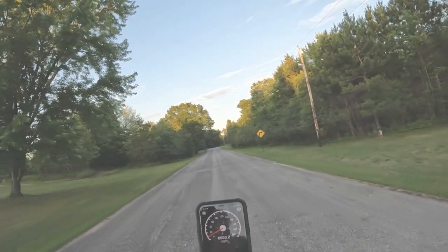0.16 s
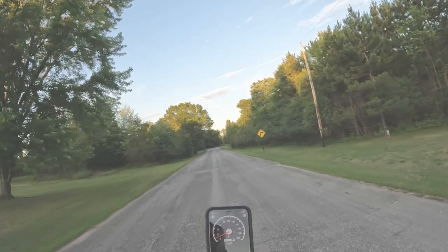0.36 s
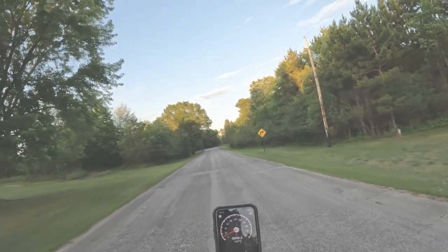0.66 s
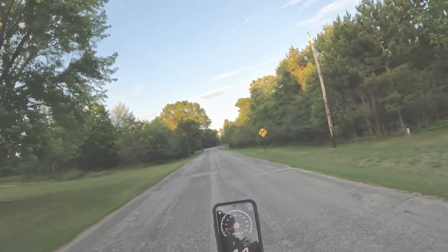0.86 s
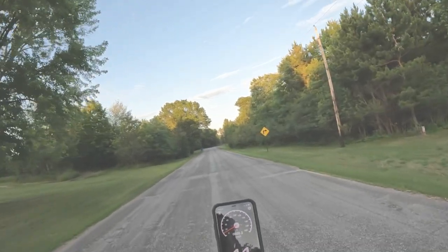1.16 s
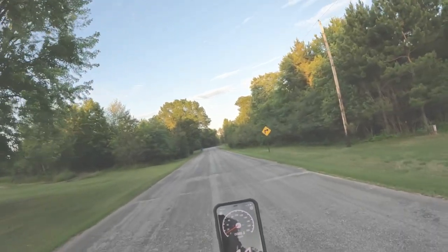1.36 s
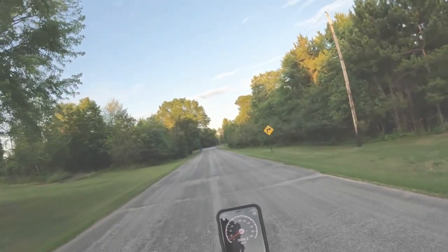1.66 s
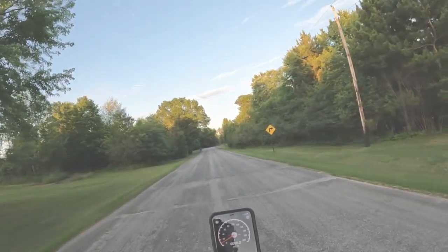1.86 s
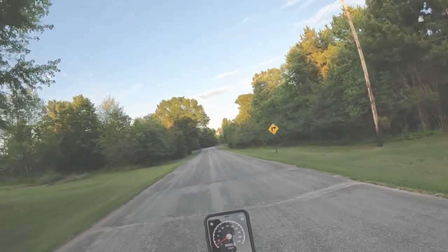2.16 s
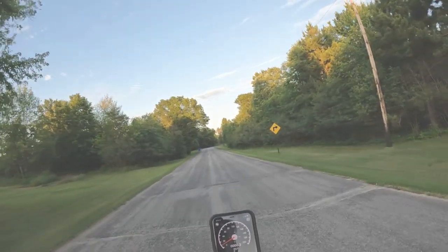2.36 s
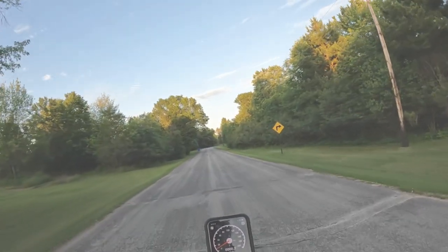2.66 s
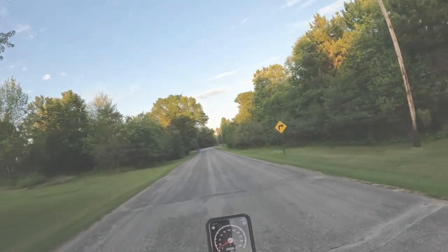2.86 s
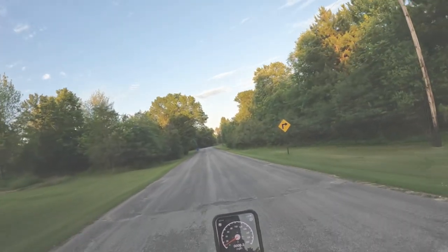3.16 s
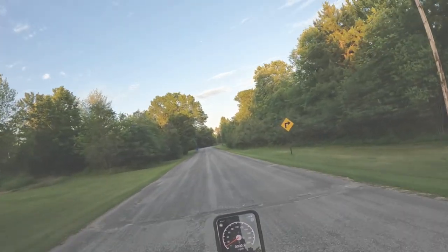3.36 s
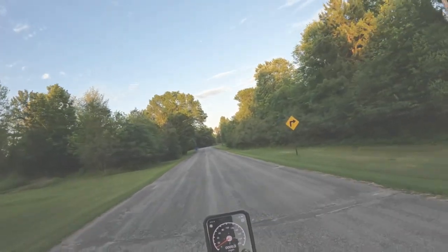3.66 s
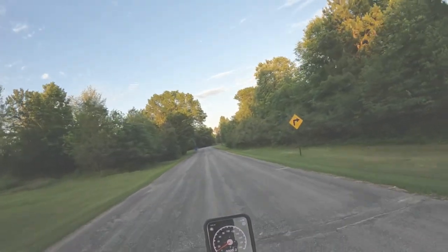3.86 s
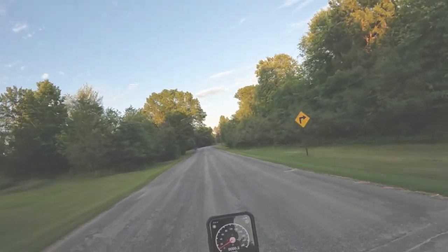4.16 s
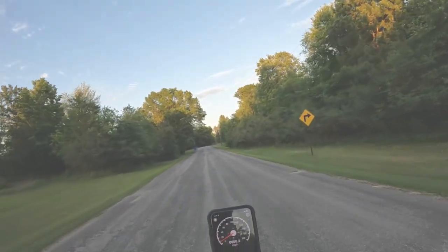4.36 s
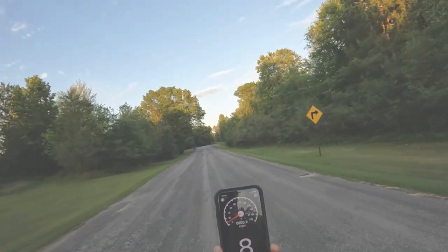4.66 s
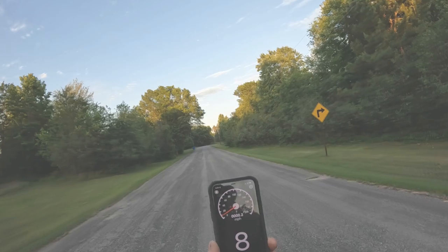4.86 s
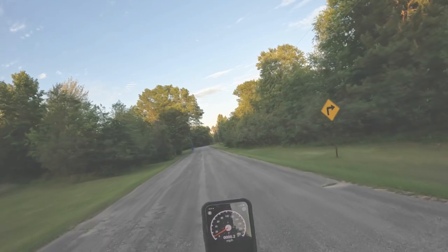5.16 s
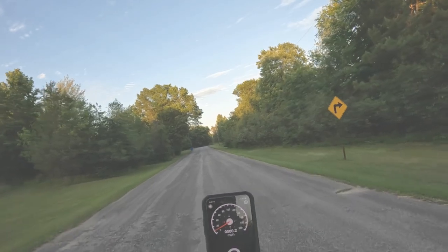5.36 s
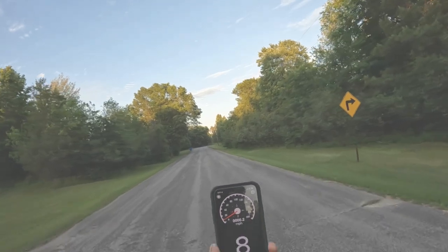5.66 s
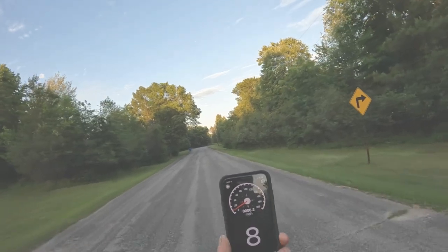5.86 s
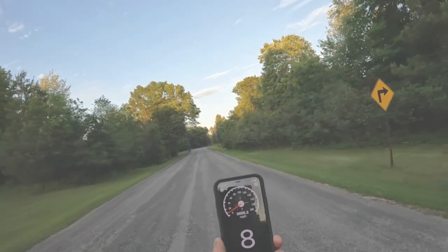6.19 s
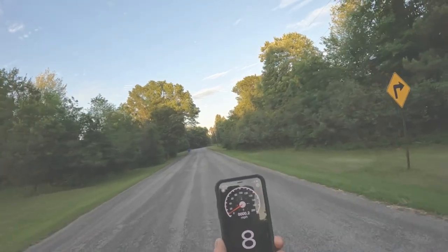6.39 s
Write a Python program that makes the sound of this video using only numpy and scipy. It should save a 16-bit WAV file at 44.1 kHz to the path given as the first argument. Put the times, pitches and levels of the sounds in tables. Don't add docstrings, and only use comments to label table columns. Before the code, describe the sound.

A small electric scooter motor sings a steady mid-pitched whine over chain rattle, tyre rumble, crack knocks and buffeting headwind on a paved road.

```python
import sys
import numpy as np
from scipy import signal
from scipy.fft import rfft, irfft, next_fast_len
from scipy.io import wavfile
from scipy.ndimage import uniform_filter1d

SR = 44100
rng = np.random.default_rng(int(sys.argv[2]) if len(sys.argv) > 2 else 0)


def master_out(mix):
    frames = np.transpose(np.atleast_2d(mix))
    ceiling = np.clip(frames, -1, 1)
    pcm = np.round(ceiling * 32767).astype(np.int16)
    wavfile.write(sys.argv[1], SR, pcm)


def volts(x):
    e = np.asarray(x, float) / 20
    return 10 ** e


N = 287973

# (start [s], end [s], level [dB], fade in [dB/s], fade out [dB/s])
INSECTS = [
    (1.35, 3.34, -67, 39, 100),
    (3.4, 3.94, -75.5, 60, 61),
    (4.8, 4.84, -69.5, 24, 250),
    (0.2, 5.9, -80, 30, 14.5),
]

# (time [s], buffet level [dB])
GUSTS = [(0, -34), (.6, -23), (.95, -22), (1.02, -33.5), (2, -38.5), (2.45, -44.5), (2.95, -30.5),
         (3.2, -33.5), (3.55, -28), (4.5, -29.5), (5.15, -25.5), (5.4, -22), (5.9, -21), (6.53, -18.5)]
# (frequency [Hz], density [dB per Hz])
WIND_SPECTRUM = [(10, -8), (25, 2), (60, -1), (110, -11), (170, -25.5), (300, -45.5), (1500, -100)]
# (time [s], buffet change [dB], puff change [dB])
EDDIES = [(.11, 7, -1.5), (.28, 1, 6), (.44, -0.5, 0.5), (.55, 1, 9), (.68, 5, 7), (.74, -5.5, -3.5),
          (.83, -7, -4), (.91, 4.5, 13), (1.33, 4.5, 7.5), (2.18, 14, 16), (2.92, 1.5, 8), (3.07, -6, -2.5),
          (3.48, 1, 8.5), (3.77, 6.5, 10.5), (4.07, 4, 6), (4.22, -1, 8.5), (4.5, 5.5, 4), (4.68, 4.5, 9.5),
          (4.82, 11.5, 18.5), (4.94, -13, -6), (5.15, -9.5, -6), (5.25, 0.5, 10), (5.5, -0.2, 9),
          (5.63, -0.2, 8.5), (5.78, -14.5, -7), (5.89, 3, 9.5), (6.02, 1, 6), (6.14, 2, 7), (6.27, 1.5, 8),
          (6.37, 1.5, 7)]
EDDY_S, PUFF_DB, PUFF_PER_GUST = 0.078, -38.5, .6
SLAP_DB, SLAP_PER_PUFF = -28, 1.6

# (frequency [Hz], density [dB per Hz])
ROAD_SPECTRUM = [(150, -28.5), (240, -6.5), (330, -2.5), (420, -2.5), (500, -3.5), (600, 1), (700, -7.5),
                 (760, -12.5), (830, -7.5), (950, -24), (1300, -27.5)]
# (time [s], level change [dB], length [s])
PATCHES = [(.28, 3, 0.11), (1.42, 3, .2), (1.56, 3.5, 0.054), (2.21, 2.5, .06), (2.73, -2.5, 0.56),
           (3.46, 3, .1), (4.68, -2.5, 0.069), (4.86, -2, 0.18), (5.03, 3.3, 0.12), (5.16, -2.5, 0.084),
           (6.1, 3, 0.11), (6.45, -4, 0.071)]
ROAD_DB, ROAD_PER_LOAD = -29.5, 0.13
# (time [s], thud peak [dB], upper ring peak [dB])
CRACKS = [(0.245, -20, -37), (1.42, -20, -46), (1.541, -16.5, -31), (1.775, -24, -38), (2.201, -19.5, -45),
          (2.312, -30, -43), (2.503, -25, -37), (2.832, -29, -37.5), (3.178, -31, -40),
          (3.848, -18.5, -30.5), (5.003, -20, -39), (5.072, -20.5, -38), (5.771, -24, -43),
          (6.104, -18, -25.5), (6.267, -23, -34)]

# (time [s], level [dB])
LOAD = [(0, -38.5), (.5, -39), (1.2, -41), (2.3, -42.9), (3.6, -41.5), (4, -39.5), (4.7, -41), (5.3, -39),
        (5.9, -40.5), (6.53, -39.5)]
# (frequency [Hz], density [dB per Hz])
CHAIN_SPECTRUM = [(700, -30), (900, -7.5), (1130, -8.5), (1750, -11), (2150, -15), (3160, -15.5),
                  (4150, -21.5), (4800, -29.5), (6000, -27.5), (8000, -33), (8500, -40), (9700, -45.5),
                  (11500, -48.5), (13500, -58.5), (14500, -75)]
# (frequency [Hz], width [Hz], level [dB])
FRAME = [(1264, 180, 0.5), (1395, 180, 0), (1557, 200, 2), (1875, 150, -2.5), (2043, 160, -5),
         (2287, 150, 2), (2398, 170, 1), (2570, 90, -2.5), (2694, 40, 1), (2830, 200, 0.5), (3490, 300, -4),
         (3606, 200, -2), (4345, 240, -13), (4540, 240, -7), (4930, 220, -12.5), (5235, 200, -11.5),
         (5500, 260, -17), (6710, 340, -18), (10500, 1200, -32)]
CHAIN_DB = -1.1

# (time [s], motor tone [Hz])
DRIVE = [(0, 394.2), (.2, 404.5), (.34, 397), (.6, 391.6), (1.13, 401.4), (1.4, 393.8), (1.75, 397.1),
         (2.05, 406.5), (2.25, 403.5), (2.4, 394.5), (2.6, 402.7), (2.9, 405.2), (3.3, 400.2),
         (4.55, 404.7), (5.33, 394.1), (5.58, 416.5), (5.9, 398.8), (6.53, 410)]
# (time [s], tone change [Hz])
HOPS = [
    (3.69, 3),
    (3.82, 11),
    (3.92, -3),
    (4.02, 3),
    (4.15, -4),
    (4.85, -5),
    (5.01, 19),
    (5.5, 4),
    (5.66, 3),
    (6.4, -3.5),
]
# (time [s], tone level [dB])
PULL = [(0, -27.7), (.1, -22), (1, -17.5), (1.35, -23), (1.75, -23), (1.85, -18.5), (2.3, -23.5),
        (3.4, -19), (3.9, -20.7), (4.9, -20), (5.1, -22.5), (5.5, -23.5), (6, -19.5), (6.53, -21.6)]
# (time [s], tone level change [dB])
SLACK = [(.17, 5), (.59, -7.5), (.74, -3), (.92, -3.5), (1.08, -4.5), (1.43, -8), (1.5, -5), (1.58, -4.5),
         (1.7, -6), (1.96, -3), (2.32, 2.8), (2.53, 5), (3.47, -2.8), (3.89, -4), (4.94, 4), (5.02, -3.5),
         (5.34, -3.2), (5.43, 5), (6.13, -5), (6.25, -2.5)]
HOP_S, SLACK_S = 0.0797, 0.071
# (multiple of the tone, level re tone [dB], flutter [dB], wheel throb [dB], sprocket throb [dB])
ORDERS = [(4 / 3, -18.5, 2.5, 0, 0), (1.5, -23, 3, -1, 0.5), (2, -19.5, 2.5, 5, 3), (3, -34.5, 3, 1.5, 0.5),
          (4, -25.5, 2.5, 1, 0.5)]
# (multiple of the tone, level re tone [dB], wander [Hz])
SIDE_TONES = [(.842, -19.5, 6), (1.158, -21.5, 6), (3.165, -37, 8), (3.845, -29, 9), (4.155, -39.5, 9),
              (6.67, -36, 12)]
WHEEL_RATIO, SPROCKET_RATIO, LOOP_RATIO = 1 / 47, .0923, 1 / 145
WHEEL_START, SPROCKET_START, LOOP_START = -1.3, 1.66, -1.63
LOOP_DB = 0.63
LOWEST_PER_LOAD, SECOND_PER_LOAD, FOURTH_PER_LOAD, SECOND_DB_PER_HZ = 1.5, .5, 1.4, 0.26

# (low edge [Hz], high edge [Hz], share of time)
DROPOUTS = [(7600, 8250, .03), (8250, 8950, .13), (8950, 9650, .2), (9650, 10350, .2), (10350, 11200, .14),
            (11200, 11900, .03)]


def rms_one(x):
    return x / np.sqrt(np.mean(x ** 2) + 1e-20)


def in_time(rows):
    s, *columns = np.transpose(rows)
    return [np.interp(np.arange(N) / SR, s, column) for column in columns]


def bumps(rows):
    t = np.arange(0, N + 99, 100) / SR
    coarse = sum(height * np.exp(-(2 * (t - s) / length) ** 2) for s, height, length in rows)
    return np.interp(np.arange(N) / SR, t, coarse)


def drift(rate):
    r = np.exp(-40 * np.pi * rate / SR)
    noise = rng.standard_normal(N // 20 + 4002)
    slow = signal.lfilter([1], [1, -2 * r, r * r], noise)[4000:]
    return np.interp(np.arange(N) / 20, np.arange(len(slow)), rms_one(slow))


def colour(x, spectrum):
    hz, level_db = np.transpose(spectrum)
    size = next_fast_len(N)
    grid = np.arange(size // 2 + 1) * SR / size + 1
    gain_db = np.interp(np.log(grid), np.log(hz), level_db, left=-70, right=-110)
    return rms_one(irfft(rfft(x, size) * volts(gain_db), size)[:N])


def resonate(x, hz, width):
    r = np.exp(-np.pi * width / SR)
    poles = [1, -2 * r * np.cos(2 * np.pi * hz / SR), r * r]
    return signal.lfilter([(1 - r * r) / 2, 0, (r * r - 1) / 2], poles, x)


def band_noise(order, low_hz, high_hz):
    band = signal.butter(order, [low_hz, high_hz], "band", fs=SR, output="sos")
    return signal.sosfilt(band, rng.standard_normal(N))


def insects():
    t = np.arange(N) / SR
    trees_db = [db - rise * np.maximum(start - t, 0) - fall * np.maximum(t - end, 0)
                for start, end, db, rise, fall in INSECTS]
    buzz_db = np.max(trees_db, axis=0)
    band = resonate(resonate(rng.standard_normal(N), 12500, 1500), 13100, 1500)
    return volts(buzz_db + 1.2 * drift(8) + 1.5 * drift(90)) * rms_one(band)


def wind():
    gust_db, = in_time(GUSTS)
    lull_db = bumps([(6.47, -9.5, .08)])
    buffet_db = gust_db + lull_db + bumps([(s, db, EDDY_S) for s, db, _ in EDDIES])
    puff_db = PUFF_DB + PUFF_PER_GUST * (gust_db - gust_db.mean()) + lull_db
    puff_db = puff_db + bumps([(s, db, EDDY_S) for s, _, db in EDDIES])
    lumps = drift(16)
    deep = rms_one(volts(2.0 * lumps) * colour(rng.standard_normal(N), WIND_SPECTRUM))
    puffs = rms_one(volts(2.3 * lumps) * band_noise(3, 75, 170))
    slaps = rms_one(band_noise(2, 170, 330))
    slap_db = SLAP_DB + SLAP_PER_PUFF * (puff_db - puff_db.max())
    total = volts(slap_db) * slaps + volts(buffet_db) * deep + volts(puff_db - 2.5) * puffs
    return signal.sosfilt(signal.butter(4, 900, fs=SR, output="sos"), total)


def tyres(road_db):
    lumpy_db = road_db + 2.0 + 1.6 * drift(9) + .8 * drift(30)
    return volts(lumpy_db) * colour(rng.standard_normal(N), ROAD_SPECTRUM)


def knocks():
    low, high = np.zeros((2, N)) + 1e-18
    for s, low_db, high_db in CRACKS:
        low[round(s * SR)] += volts(low_db)
        high[round(s * SR)] += volts(high_db)
    thud = resonate(resonate(resonate(low, 600, 330), 660, 400), 704, 330)
    ring = resonate(resonate(resonate(high, 1310, 240), 1330, 300), 1370, 240)
    soft = signal.butter(4, 2500, fs=SR, output="sos")
    return signal.sosfilt(soft, volts(40.5) * thud + volts(45.5) * ring)


def chain(tone_hz, chain_db):
    phase = 2 * np.pi * np.cumsum(tone_hz) / SR
    bunching_db = 1.2 * np.cos(phase) + .6 * np.cos(SPROCKET_RATIO * phase) + 0.36 * np.cos(WHEEL_RATIO * phase)
    sizes = volts(1.8 * np.minimum(rng.exponential(1, N), 4) + bunching_db)
    contacts = rms_one(sizes * rng.standard_normal(N))
    ringing = np.zeros(N)
    for hz, width, db in FRAME:
        struck = np.roll(contacts, rng.integers(N))
        part = resonate(resonate(struck, hz, width), hz, width)
        ringing += volts(db + 2.1 * drift(12)) * part
    broad = colour(contacts[::-1], CHAIN_SPECTRUM)
    level = volts(chain_db + .4 * drift(9.7) + .9 * drift(40))
    return level * (volts(1.5) * broad + volts(.5) * rms_one(ringing))


def motor(tone_hz, tone_db, load_db):
    phase = 2 * np.pi * np.cumsum(tone_hz) / SR
    wheel = np.cos(WHEEL_RATIO * phase + WHEEL_START)
    sprocket = np.cos(SPROCKET_RATIO * phase + SPROCKET_START)
    lowest = ORDERS[0][0]
    strain_db = {lowest: LOWEST_PER_LOAD * load_db,
                 2: SECOND_PER_LOAD * load_db + SECOND_DB_PER_HZ * (tone_hz - tone_hz.mean()),
                 4: FOURTH_PER_LOAD * load_db}
    out = volts(tone_db + 1.26 * drift(18)) * np.sin(phase + 0.13 * drift(16))
    mean_db = np.mean(tone_db)
    for multiple, db, flutter_db, wheel_db, sprocket_db in ORDERS:
        throb_db = flutter_db * drift(6) + wheel_db * wheel + sprocket_db * sprocket
        level = volts(mean_db + db + strain_db.get(multiple, 0) + throb_db)
        out += level * np.sin(multiple * phase + .25 * drift(12))
    for multiple, db, wander_hz in SIDE_TONES:
        slip = 2 * np.pi * np.cumsum(wander_hz * drift(7.97)) / SR
        sink_db = 0.83 * strain_db[4] * (multiple < 2)
        out += volts(mean_db + db + 3 * drift(9) - sink_db) * np.sin(multiple * phase + slip)
    return np.sqrt(2) * out


def scene():
    tone_hz = in_time(DRIVE)[0] + bumps([(s, hz, HOP_S) for s, hz in HOPS])
    loop = np.cos(LOOP_RATIO * 2 * np.pi * np.cumsum(tone_hz) / SR + LOOP_START)
    tone_db = in_time(PULL)[0] + bumps([(s, db, SLACK_S) for s, db in SLACK]) + LOOP_DB * loop
    load_db, = in_time(LOAD)
    strain_db = load_db - load_db.mean()
    road_db = ROAD_DB + ROAD_PER_LOAD * strain_db + bumps(PATCHES)
    surroundings = insects() + wind()
    running = tyres(road_db) + knocks()
    drive = chain(tone_hz, load_db + CHAIN_DB) + motor(tone_hz, tone_db, strain_db)
    return (surroundings + running + drive)[None]


def treble_dropouts(x):
    padded = np.pad(x, [(0, 0), (0, 2048)], "reflect")
    hz, s, frames = signal.stft(padded, SR, boundary="even", nperseg=1024)
    at = np.minimum((s * SR).astype(int), N - 1)
    for low_hz, high_hz, share in DROPOUTS:
        chance = (drift(6) + .6 * drift(30))[at]
        band = (hz > low_hz) & (hz <= high_hz)
        frames[..., band, :] *= np.where(chance < np.quantile(chance, share), .01, 1)
    return signal.istft(frames, SR, nperseg=1024)[1][..., :N]


def low_pass(x):
    return signal.sosfilt(signal.butter(12, 15720, fs=SR, output="sos"), x)


def record(dry):
    dull = signal.sosfilt(signal.butter(4, 14200, fs=SR, output="sos"), dry)
    envelope = np.abs(signal.hilbert(dull, next_fast_len(N))[:, :N])
    gain = 1 / np.hypot(1, uniform_filter1d(envelope, size=200) / 0.6)
    mix = treble_dropouts(gain * dull)
    return low_pass(mix)


dry = scene()
out = record(dry)
master_out(out)
```